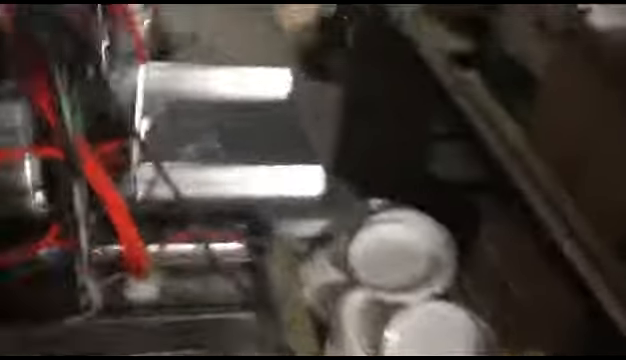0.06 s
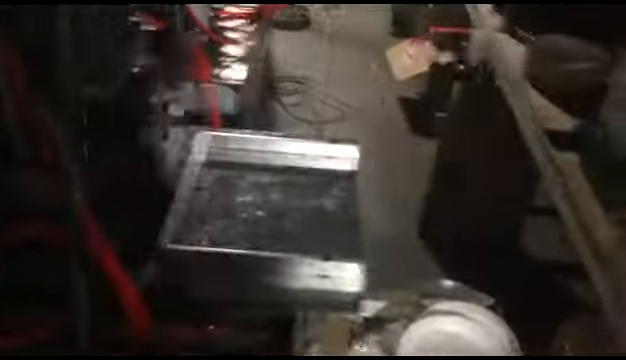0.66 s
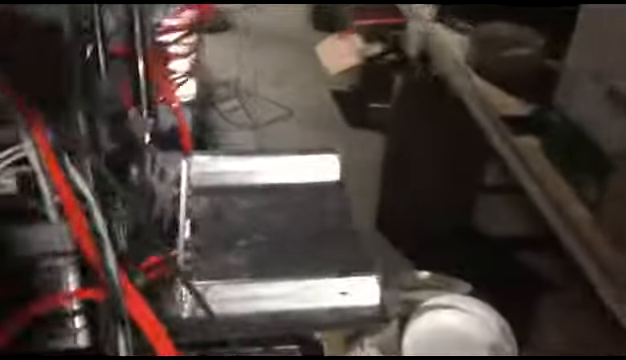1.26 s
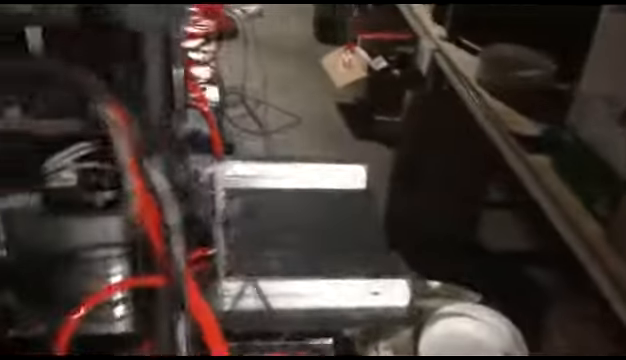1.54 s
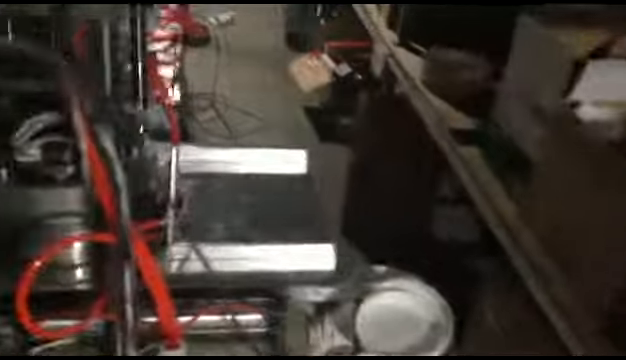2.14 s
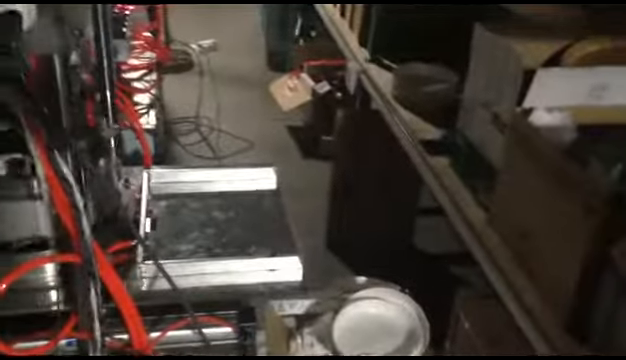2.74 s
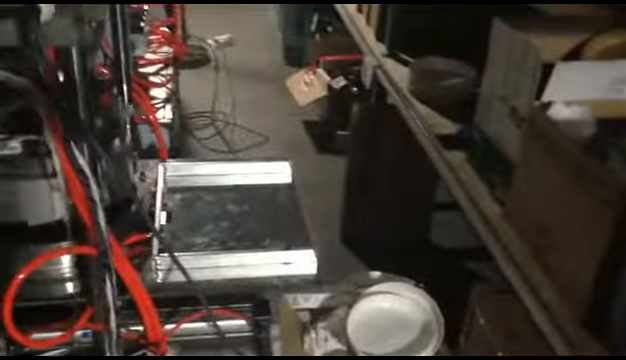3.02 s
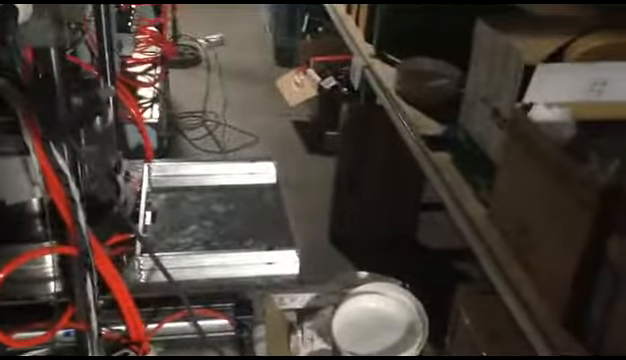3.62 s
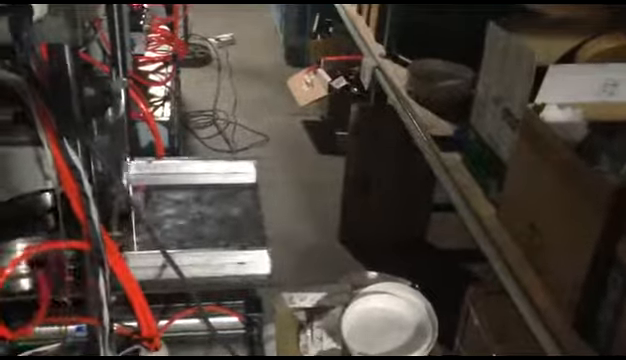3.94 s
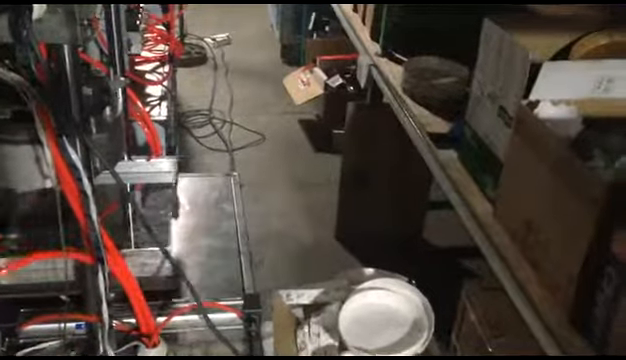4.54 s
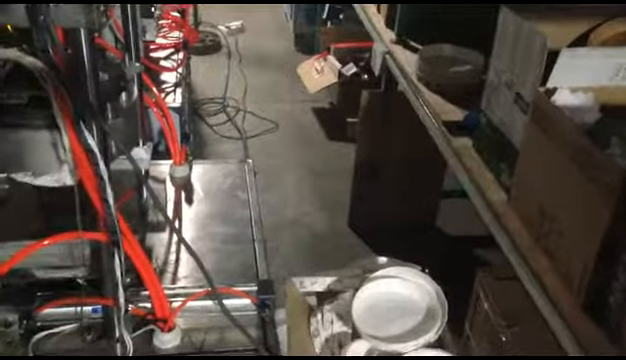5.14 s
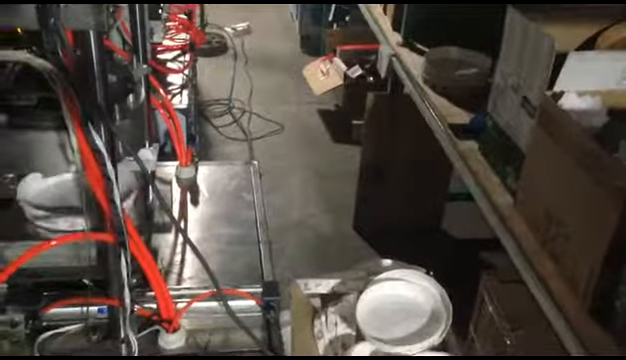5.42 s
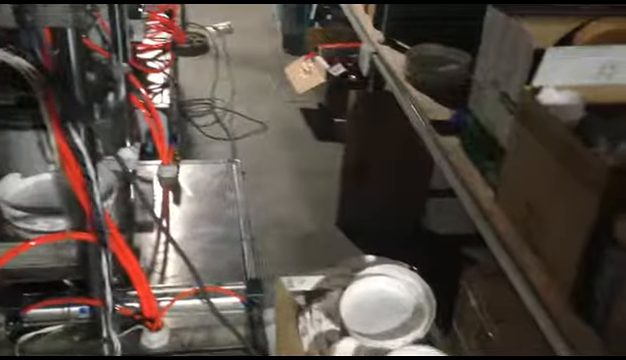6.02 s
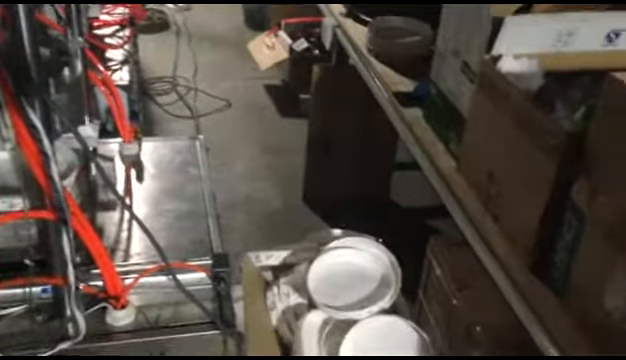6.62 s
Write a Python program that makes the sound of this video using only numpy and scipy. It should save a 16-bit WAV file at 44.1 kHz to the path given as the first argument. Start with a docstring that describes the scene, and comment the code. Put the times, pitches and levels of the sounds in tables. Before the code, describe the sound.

A pneumatic paper cup forming machine works close to the microphone, over low workshop noise. At first a soft air leak fades, with a light knock and faint ticks. At about 1.3 seconds a valve opens with a sudden loud hiss that slowly dies away over the next three seconds. The metal carriage rumbles beneath it, knocking at 1.8 seconds and clacking hard at 2.6. A thin whistle enters near 2.9 seconds and slides down in pitch into a knock at 3.8. From 4 seconds a softer hiss and low rumble lead to a sharp, loud clack at 4.9, followed by small ticks. At 5.4 seconds a loud blast of air roars out and turns into a strong hiss with a high, breathy whistle. It surges again around 6.3 seconds and falls away quickly after 6.6.

```python
"""A pneumatic paper cup forming machine runs one cycle, close to a mono microphone in a workshop.
Valves dump air in long hisses that start with a surge and fade as the cylinders empty; narrow ports
whistle along. The carriage rumbles on its guides and knocks against its stops; small parts tick in
between. A loud blast through the silencer ends the cycle, with low room noise behind it all."""
import sys
import numpy as np
from scipy import signal
from scipy.fft import rfft, irfft
from scipy.io import wavfile

SR = 44100
rng = np.random.default_rng(int(sys.argv[2]) if len(sys.argv) > 2 else 0)


def unload_wav(signal):
    """Save mono or channel-first audio to the path in sys.argv[1] as 16-bit WAV at rate SR, clipped to [-1, 1]."""
    wavfile.write(
        sys.argv[1],
        SR,
        np.round(np.clip(np.atleast_2d(signal).T, -1, 1) * 32767).astype(np.int16),
    )


N = 298557
TIME = np.arange(N) / SR
BIN_HZ = np.maximum(np.arange(N // 2 + 1) * SR / N, 1)
CUTOFF_HZ = 15550

# Broad spectrum of each air jet at the microphone: f/Hz, relative level/dB
VENT_COLOUR = [(300, -12), (600, -12), (1700, -7), (3500, -7.5), (8000, -10.5), (12000, 0.5), (14000, -9),
               (15300, -5.0)]
SURGE_COLOUR = [(300, -15), (700, -22.5), (1300, -10.5), (2100, -2), (3000, -9.5), (5500, 0.5),
                (8000, -2.5), (11000, -2.5), (15300, -5)]
EXHAUST_COLOUR = [(400, -15), (700, -8.5), (1300, -13), (2300, -5), (5500, 1), (8000, -5.0), (11000, 1.5),
                  (15300, -6.5)]
FEED_COLOUR = [(500, -1), (1200, -6.5), (2500, -6.5), (4400, -2.5), (6000, -8.5), (8000, -7.5),
               (11500, -13.5), (14000, -17), (15300, -18)]
ROAR_COLOUR = [(150, -39), (500, -27.5), (1300, -16), (2400, -12.5), (3700, 0.5), (7000, -3.5), (9500, -7),
               (11500, -13), (15300, -12)]
SILENCER_COLOUR = [(150, -48), (300, -42), (600, -27), (1300, -26), (2400, -5.5), (4300, 0), (6500, -3.5),
                   (8000, -14), (12000, -9.5), (15300, -9)]
# Narrow peaks and dips that colour each hiss: f/Hz, width/Hz, height/dB
VENT_PEAKS = [(920, 40, 6.5), (1040, 40, 11.5), (1310, 40, -4.5), (1675, 140, 9), (2300, 560, 7.5),
              (3220, 1000, 9.5), (4700, 190, 9.5), (5140, 350, 5.5), (5740, 90, 3), (6710, 1200, 13),
              (9470, 670, 10)]
SURGE_PEAKS = [(583, 38, 9.3), (714, 73, 7.9), (930, 60, 8.7), (1030, 54, 6.4), (1140, 120, 3.5),
               (1540, 45, 6.3), (2100, 150, 2), (2400, 650, 5.4), (3260, 340, 8.6), (4400, 1100, 3.3),
               (9840, 400, 2.2), (10900, 1200, 3.7)]
EXHAUST_PEAKS = [(1040, 29, 8), (1240, 110, -0.5), (1436, 97, 3.5), (1606, 170, 7.5), (2460, 1420, 6.0),
                 (3100, 75, -5.5), (3410, 230, 3), (3810, 39, -3), (4800, 370, 1.5), (5620, 94, 1.5),
                 (7520, 110, 6.5), (9650, 130, 3), (9740, 30, 0.5)]
FEED_PEAKS = [(630, 220, -1.5), (1080, 290, -9), (5170, 1200, -2), (8050, 400, -0.5), (11300, 400, 4)]
ROAR_PEAKS = [(684, 64, 1), (860, 240, -5.5), (1070, 67, -4), (1920, 45, 5), (2184, 39, 7),
              (2496, 230, 10.5), (2900, 83, -5), (3220, 70, 6), (3410, 70, 4), (3940, 290, 3),
              (4120, 58, -11), (6900, 79, 1), (7380, 29, 6.5)]
SILENCER_PEAKS = [(510, 85, 7.5), (860, 77, -5.5), (905, 80, 3.5), (1270, 240, 8.0), (2870, 410, -6),
                  (3900, 1400, 3), (4840, 39, 7), (5800, 170, -3.5), (6760, 70, 4.5), (7370, 64, -10),
                  (7400, 40, 1), (9070, 1100, 7), (10500, 89, 4.5)]
# Spectra of the room, the shaking frame, the guides and the rattle: f/Hz, relative level/dB
ROOM_COLOUR = [(15, -44), (25, -12), (101, 6), (313, -14.5), (388, -5), (432, -9), (580, -13.5), (868, -10),
               (1330, -14.5), (2350, -10.5), (2990, -21), (3710, -12), (15400, -42)]
RUMBLE_COLOUR = [(35, -22), (70, -4.5), (110, 2.5), (145, 3), (210, 4), (270, 2), (350, -5), (550, -17)]
GRIND_COLOUR = [(300, -14), (480, -4), (670, 2), (880, -6), (1150, -1.5), (2500, -22.5)]
RATTLE_COLOUR = [(200, 9.5), (900, 5.5), (2200, 2), (5000, 0), (8000, -3), (12000, -3), (15400, -16)]
# Spells of rumble and grinding, from carriage travel and the boom after knocks:
# start/s, end/s, rumble/dB, grinding/dB
RUMBLE_SPELLS = [(1.25, 1.31, -42, -39), (1.477, 1.895, -35, -35.5), (1.99, 2.27, -51, -41),
                 (2.337, 2.52, -38, -41.5), (2.55, 2.7, -28, -46), (2.8, 3.6, -45.5, -50),
                 (3.85, 4.42, -37, -47.5), (4.394, 4.916, -35.5, -47), (5.043, 5.35, -38.5, -45),
                 (5.108, 5.154, -36, -33), (5.355, 5.705, -62, -41), (6.59, 6.75, -39.5, -52)]
# Knocks on the stops, and the blast valve knocking open at 5.389 s: t/s, thud/dB, thud f/Hz, clack/dB, clack
# f/Hz, clack t60/s, rattle/dB, rattle t60/s
KNOCKS = [(0.596, -33, 300, -29.5, 493, 0.018, -39.5, 0.1), (1.255, -18, 130, -32, 890, 0.018, -38, 0.11),
          (1.751, -5, 349, -11, 2030, 0.024, -37, 0.091), (2.552, -14.5, 189, -2.5, 1900, 0.018, -27, 0.54),
          (2.556, -25, 313, 2.5, 3030, 0.014, -31, 0.38), (2.589, -9.5, 312, -12, 2450, .03, -36, .1),
          (3.7656, -16, 192.5, -1, 900, 0.0031, -25, 0.081),
          (4.9329, -10.5, 197, 6, 1800, 0.0075, -16.5, 0.27),
          (5.119, -24, 747, -19, 1300, 0.014, -27.5, 0.028),
          (5.389, -24, 197, -22, 695, 0.018, -22.5, 0.11), (5.4, -15.5, 440, -12, 680, 0.025, -20.5, 0.092),
          (5.907, -27, 224, -13.5, 1550, 0.018, -30, 0.069),
          (6.613, -21.5, 97.6, -34, 1480, .012, -26, 0.13)]
# Small parts ticking and scuffing: t/s, level/dB, f/Hz, relative width, t60/s
TICKS = [(0.675, -40, 2200, 0.7, 0.25), (0.697, -48, 2700, .55, 0.13), (0.92, -49, 4500, .7, 0.19),
         (1.056, -57, 2200, .3, .2), (1.097, -52, 3600, 0.98, 0.23), (5.118, -25, 5600, 0.06, 0.062),
         (5.156, -23.5, 7200, 0.21, 0.04), (5.174, -25, 7500, 0.15, 0.026)]
# Whistles of a chamber and of narrow ports: t/s, f/Hz, level/dB
CHAMBER_TONE = [(1.35, 995, -60), (1.43, 1015, -41), (1.6, 934, -35), (1.7, 704, -66), (1.9, 450, -47),
                (2.05, 582, -43), (2.27, 749, -40.5), (2.5, 892, -49), (2.56, 884, -62)]
PORT_WHISTLE = [(2.88, 2420, -53), (2.91, 2385, -33), (3.17, 2380, -32), (3.35, 2377, -23.5),
                (3.57, 2390, -24), (3.61, 2160, -33), (3.68, 1790, -35.5), (3.75, 1516, -33),
                (3.8, 1430, -53)]
FEED_WHISTLE = [(4.05, 3700, -39.5), (4.2, 3690, -39.5), (4.42, 3560, -37), (4.68, 3680, -38.5),
                (4.92, 3500, -33.5), (4.96, 3520, -55)]
RETURN_WHISTLE = [(4.96, 2092, -55), (5.02, 2240, -35), (5.09, 2544, -36.5), (5.24, 2540, -39),
                  (5.39, 2470, -43.5)]
SILENCER_WHISTLE = [(5.8, 4254, -40), (5.95, 4340, -20.5), (6.13, 4425, -16.5), (6.25, 4400, -23),
                    (6.38, 4160, -13), (6.6, 4390, -42), (6.68, 4470, -32), (6.77, 4180, -31)]
# Gusts of open roar in the blast: start/s, rise/s, end/s, level/dB, fall/(dB/s)
GUSTS = [(5.397, 0.0068, 5.728, -5.5, 103), (6.24, 0.066, 6.506, -14, 94), (6.606, .008, 6.62, -18, 234)]


def from_db(db):
    """Decibels to gain."""
    return 10 ** (np.asarray(db) / 20)


def unit_rms(x):
    """Scale to unit power."""
    return x / np.sqrt(np.mean(x ** 2) + 1e-20)


def since(start_s):
    """Seconds gone by since a moment; zero before it."""
    return np.maximum(TIME - start_s, 0)


def flow(start_s, rise_s, end_s, fall_db_per_s):
    """Gain of something that starts up, holds, and dies away once its drive ends."""
    return np.clip((TIME - start_s) / rise_s, 0, 1) * from_db(-fall_db_per_s * since(end_s))


def struck(start_s, t60, rise_s=0.0008):
    """Envelope of an impact: a quick rise, then an exponential decay."""
    age = since(start_s)
    return (1 - np.exp(-age / rise_s)) * from_db(-60 * np.minimum(age / t60, 3))


def band(x, low_hz, high_hz):
    """A gentle band-pass."""
    sos = signal.butter(2, [low_hz, min(high_hz, 0.45 * SR)], "band", fs=SR, output="sos")
    return signal.sosfilt(sos, x)


def drift(rate_hz):
    """Slow random wander of unit power."""
    return unit_rms(irfft(rfft(rng.standard_normal(N)) / (1 + (BIN_HZ / rate_hz) ** 4), N))


def reflections(share, decay_s=0.011, echoes_per_s=3000):
    """Spectral ripple from the direct path to the microphone plus short echoes off the machine frame."""
    arrives = (rng.random(N) < echoes_per_s / SR) * (TIME > 0.003)
    echoes = rng.standard_normal(N) * arrives * np.exp(-TIME / decay_s)
    return np.abs(1 + share * rfft(echoes) / np.sqrt(np.sum(echoes ** 2)))


def noise(colour, peaks=(), echo=0.5):
    """Noise of unit power with a broad colour, narrow peaks and dips, and nearby reflections."""
    hz, level_db = np.transpose(colour)
    shape_db = np.interp(np.log(BIN_HZ), np.log(hz), level_db)
    shape_db -= 12 * np.maximum(np.log2(hz[0] / BIN_HZ), 0)   # 12 dB per octave below the lowest point
    for centre_hz, width_hz, height_db in peaks:
        shape_db += height_db / (1 + (2 * (BIN_HZ - centre_hz) / width_hz) ** 2)
    spectrum = rfft(rng.standard_normal(N)) * from_db(shape_db)
    return unit_rms(irfft(spectrum * reflections(echo) * (BIN_HZ < CUTOFF_HZ), N))


def jet(air, gain, band_hz, flutter_db):
    """Air noise fluttering with turbulence; gain sets the rms of the part within band_hz."""
    low_hz, high_hz = band_hz
    in_band = irfft(rfft(air) * (BIN_HZ > low_hz) * (BIN_HZ < high_hz), N)
    return air / np.std(in_band) * gain * from_db(flutter_db * drift(26))


def vent(level_db=-33, fall_db_per_s=27):
    """The last air of the previous stroke leaks away."""
    gain = from_db(level_db - fall_db_per_s * TIME)
    return jet(noise(VENT_COLOUR, VENT_PEAKS), gain, band_hz=(4200, 16000), flutter_db=0.1)


def workshop(level_db=-55.5):
    """Low, even room noise behind the machine."""
    return from_db(level_db) * noise(ROOM_COLOUR, echo=0.37)


def rumble_and_grind(idle_rumble_db=-61, idle_grind_db=-70):
    """The carriage shakes the frame and grinds on its guides; two knocks leave a boom; a faint idle."""
    shake, rub = from_db(idle_rumble_db), from_db(idle_grind_db)
    for start, end, rumble_db, grind_db in RUMBLE_SPELLS:
        envelope = flow(start, rise_s=0.023, end_s=end, fall_db_per_s=63)
        shake = np.hypot(shake, from_db(rumble_db) * envelope)
        rub = np.hypot(rub, from_db(grind_db) * envelope)
    rumble = band(noise(RUMBLE_COLOUR, echo=1.0), 25, 640) * shake * from_db(0.72 * drift(11))
    grind = noise(GRIND_COLOUR, echo=0.59) * rub * from_db(0.4 * drift(30))
    return rumble + grind


def knocks(thud_t60=0.038, boom_db=-17, boom_t60=0.37, clatter_t60=0.22):
    """Each knock, on a stop or of the blast valve, gives a low thud and a hard clack, then the frame booms,
    clatters and rattles."""
    out = np.zeros(N)
    rattle, white = noise(RATTLE_COLOUR, echo=1.0), rng.standard_normal(N)
    for start, thud_db, thud_hz, clack_db, clack_hz, clack_t60, rattle_db, rattle_t60 in KNOCKS:
        phase_per_hz = 2 * np.pi * (TIME - start)
        thud = np.sin(phase_per_hz * thud_hz) * struck(start, thud_t60)
        body = unit_rms(band(white, thud_hz / 1.5, thud_hz * 1.5))
        boom = body * struck(start, boom_t60, rise_s=0.0029)
        clack = np.sin(phase_per_hz * clack_hz) * struck(start, clack_t60, rise_s=0.0006)
        clatter = unit_rms(band(white, clack_hz * 0.57, clack_hz * 1.5)) * struck(start, clatter_t60)
        clatter_gain = from_db(-17.5) * np.sqrt(clack_t60 / 0.016)   # loose parts: more for long clacks
        out += from_db(thud_db) * (thud + from_db(boom_db) * boom)
        out += from_db(clack_db) * (clack + clatter_gain * clatter)
        out += from_db(rattle_db) * rattle * struck(start, rattle_t60)
    return band(out, 120, CUTOFF_HZ)   # keep deep bass out of the knocks


def ticks():
    """Light contacts of small parts, each a short patch of dense ringing."""
    white, out = rng.standard_normal(N), np.zeros(N)
    for start, level_db, hz, width, t60 in TICKS:
        ringing = unit_rms(band(white, hz / (1 + width), hz * (1 + width)))
        out += from_db(level_db) * ringing * struck(start, t60, rise_s=0.0028)
    return out


def exhaust(crack_s=1.254, open_s=1.282, piston_slows_s=3.615, choke_s=4.145, choke_db_per_s=50):
    """A valve cracks, then opens fully: excess pressure surges out and the piston keeps up a hiss."""
    crack = from_db(-27.5) * flow(crack_s, rise_s=0.0062, end_s=crack_s, fall_db_per_s=15)
    surge = from_db(-12.5) * flow(open_s, rise_s=0.019, end_s=open_s, fall_db_per_s=15)
    surge *= from_db(np.exp(-since(open_s) / 0.04))   # 1 dB of overshoot as the valve opens
    push = from_db(-21.5) * flow(open_s, rise_s=0.019, end_s=piston_slows_s, fall_db_per_s=17.5)
    push *= from_db(-choke_db_per_s * since(choke_s))   # choked near the stop
    surge_air = noise(SURGE_COLOUR, SURGE_PEAKS, echo=0.65)
    bite = jet(surge_air, np.maximum(crack, surge), band_hz=(5300, 15700), flutter_db=1.06)
    piston_air = noise(EXHAUST_COLOUR, EXHAUST_PEAKS, echo=0.58)
    return bite + jet(piston_air, push, band_hz=(4760, 15700), flutter_db=0.58)


def whistle(curve, width_hz):
    """Turbulence rings a resonance whose pitch follows the air column."""
    times, pitches, levels = np.transpose(curve)
    phase = 2 * np.pi * np.cumsum(np.interp(TIME, times, pitches)) / SR
    tone = unit_rms(drift(width_hz / 2) * np.cos(phase) + drift(width_hz / 2) * np.sin(phase))
    sounding = (TIME > times[0]) * (TIME < times[-1])
    return tone * from_db(np.interp(TIME, times, levels)) * sounding


def whistles():
    """The ports and a chamber sing, from a narrow whistle to a broad, breathy band."""
    return (whistle(PORT_WHISTLE, width_hz=66) + whistle(FEED_WHISTLE, width_hz=380)
            + whistle(RETURN_WHISTLE, width_hz=1760) + whistle(CHAMBER_TONE, width_hz=180)
            + whistle(SILENCER_WHISTLE, width_hz=1270))


def feed(level_db=-37.5):
    """Air hisses softly into the carriage cylinder until it meets its stop."""
    gain = from_db(level_db) * flow(start_s=4.02, rise_s=0.11, end_s=5.03, fall_db_per_s=37)
    return jet(noise(FEED_COLOUR, FEED_PEAKS, echo=0.29), gain, band_hz=(3900, 13000), flutter_db=0.5)


def blast(silencer_s=5.71, shut_s=6.6, sag_db_per_s=7, swell_db_per_s=5):
    """Full pressure roars in gusts; the silencer takes over from the first and swells until shut off."""
    gusts = sum(from_db(level_db - sag_db_per_s * since(start)) * flow(start, rise, end, fall)
                for start, rise, end, level_db, fall in GUSTS)
    swell = from_db(-15.5 + swell_db_per_s * since(silencer_s))
    swell *= flow(silencer_s, rise_s=0.092, end_s=shut_s, fall_db_per_s=142)
    roar = jet(noise(ROAR_COLOUR, ROAR_PEAKS, echo=0.42), gusts, band_hz=(3200, 16200), flutter_db=0.5)
    silencer_air = noise(SILENCER_COLOUR, SILENCER_PEAKS, echo=0.48)
    return roar + jet(silencer_air, swell, band_hz=(3700, 16200), flutter_db=1.0)


def scene():
    """Air, whistles and moving metal at one close microphone, alike in both channels."""
    air = vent() + exhaust() + feed() + blast()
    return np.tile(air + whistles() + rumble_and_grind() + knocks() + ticks() + workshop(), (2, 1))


def record(dry, ceiling=0.96):
    """The loudest peaks overload the recorder; the top of the spectrum is cut."""
    clipped = np.clip(dry, -ceiling, ceiling)
    return irfft(rfft(clipped) / (1 + (BIN_HZ / CUTOFF_HZ) ** 200), N)


dry = scene()
out = record(dry)
unload_wav(out)
```